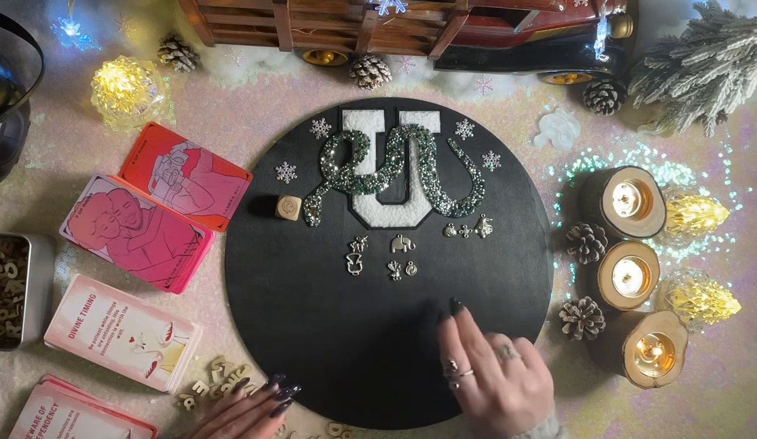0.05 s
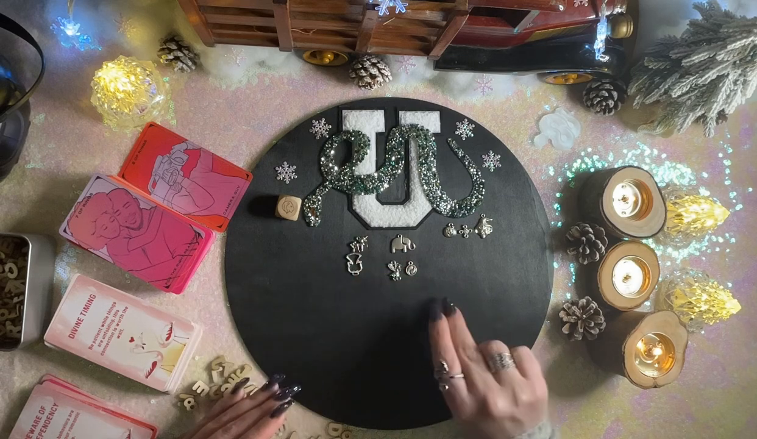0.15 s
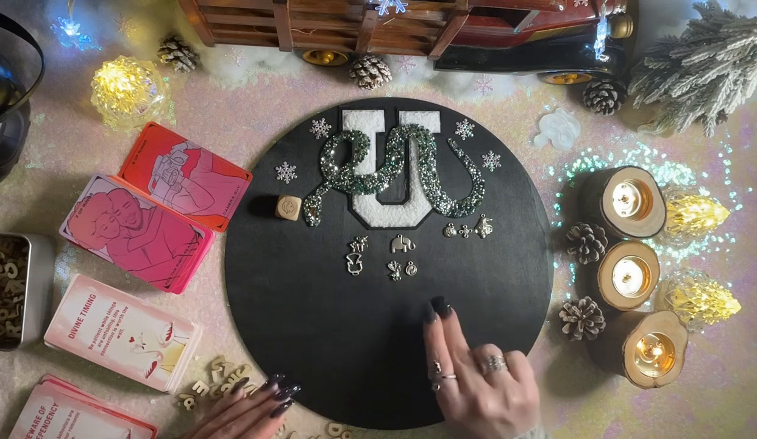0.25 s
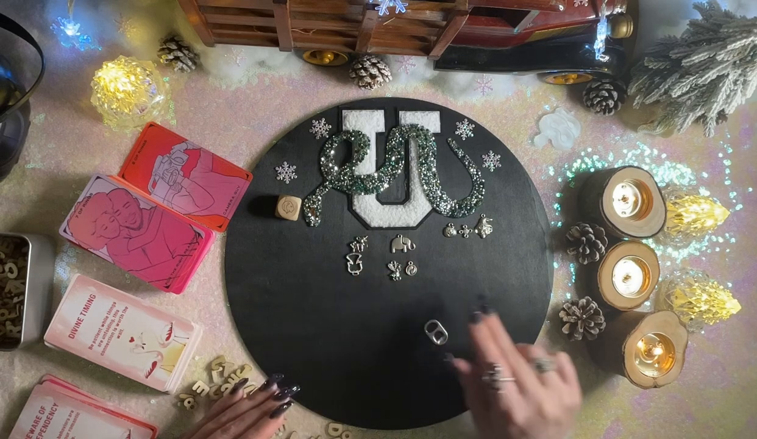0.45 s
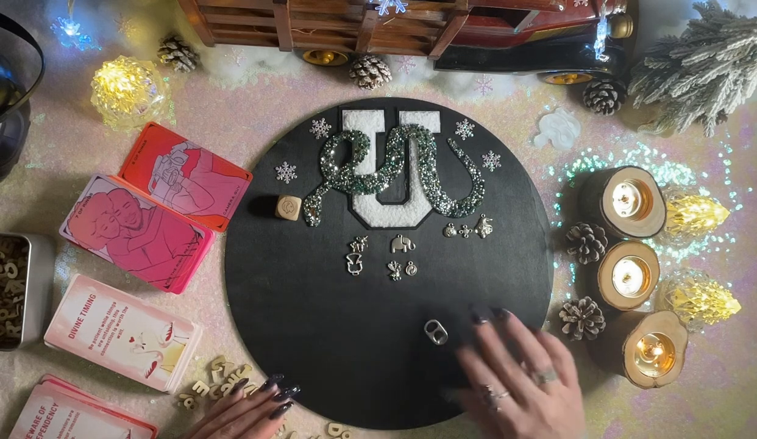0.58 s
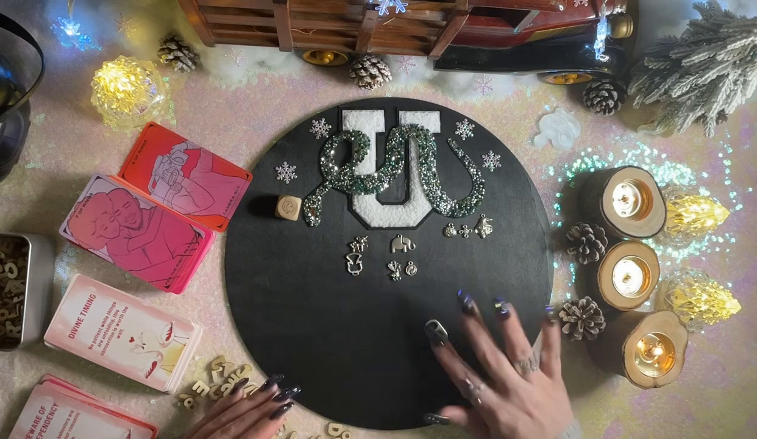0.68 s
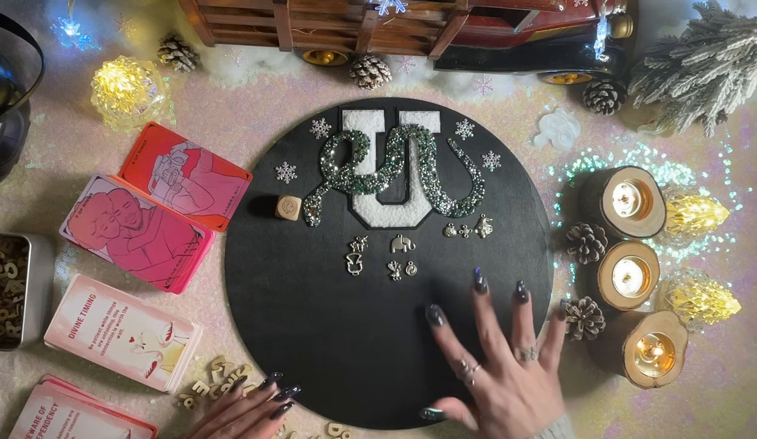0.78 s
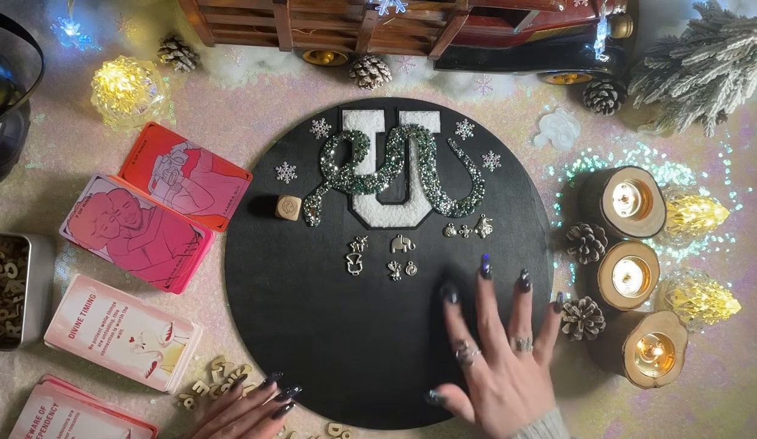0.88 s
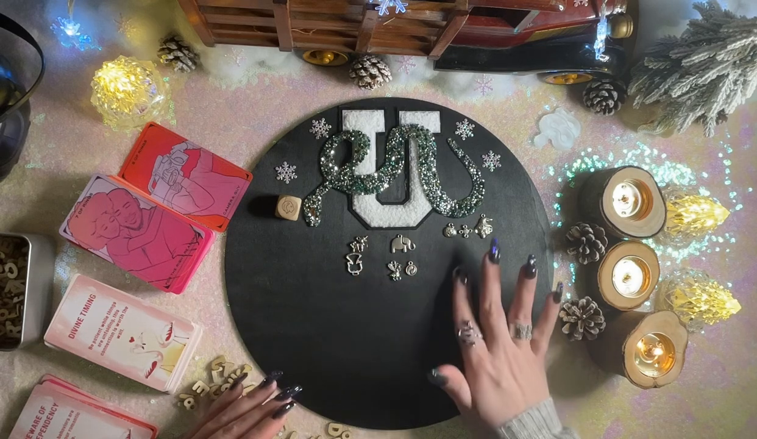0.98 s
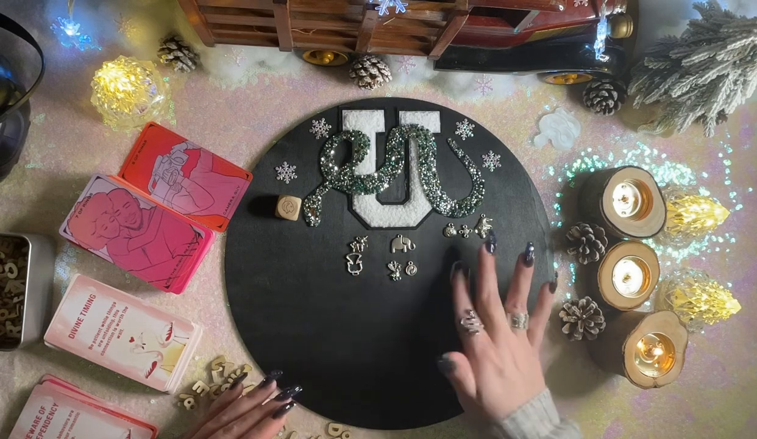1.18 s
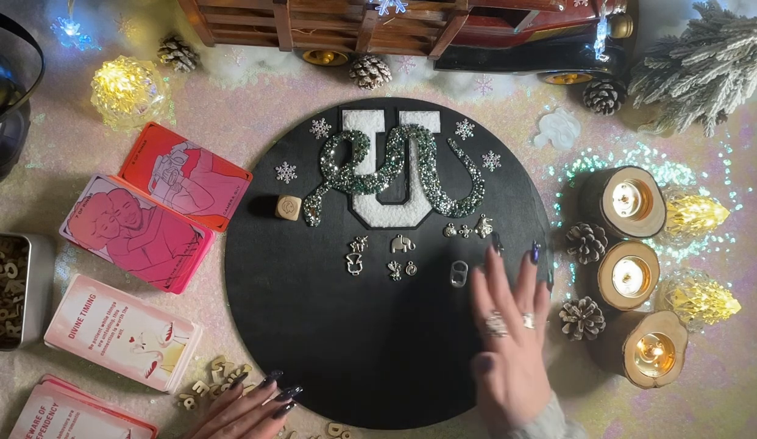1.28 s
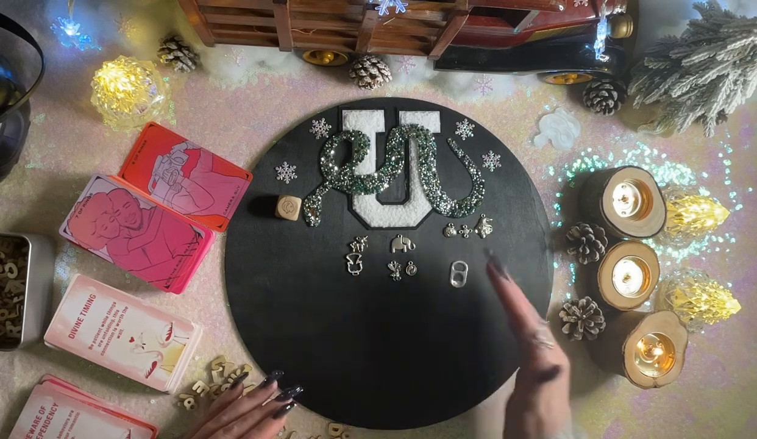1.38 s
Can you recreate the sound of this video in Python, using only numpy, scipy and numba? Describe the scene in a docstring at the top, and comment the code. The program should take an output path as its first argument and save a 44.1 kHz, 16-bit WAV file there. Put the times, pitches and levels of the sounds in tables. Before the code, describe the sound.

A small metal pull tab drops onto a thin board at about 0.2 seconds and bounces with quick, light clicks, settling by 0.5 seconds. From 0.7 seconds a fingertip slides it across the board with a grainy scrape, catching a few times. Around 1.2 to 1.3 seconds it clinks against small metal charms. A low hum and faint hiss of a small room lie underneath.

```python
"""A small room with a thin board on a table. A metal pull tab drops on the board and bounces to rest.
A fingertip slides it over the grain; it catches a few times and clinks against small charms.
Contacts are short noise cracks, the slide is dense ticks; both ring the modes of board and tab.
The room answers briefly, over a low hum, rumble and faint hiss."""
import sys
import numpy as np
from scipy import signal
from scipy.fft import rfft, irfft
from scipy.io import wavfile
from scipy.ndimage import uniform_filter1d
from numba import njit

SR = 44100
rng = np.random.default_rng(int(sys.argv[2]) if len(sys.argv) > 2 else 0)


def put_to_file(sound):
    """Save the sound as 16-bit audio at rate SR, in the file named by the first command-line argument."""
    columns = np.atleast_2d(sound).T  # one column per channel
    safe = np.clip(columns, -1, 1)
    whole_steps = np.round(safe * 32767)
    wavfile.write(sys.argv[1], SR, whole_steps.astype(np.int16))


N = 63945

# low room hum (frequency [Hz], level before swell [dB], waver [0-1])
HUM_TONES = [(61.4, -67, 1), (105.3, -58, 0.97), (117.6, -64, 0.8), (154.8, -59.5, 0.8)]
# swell of hum and rumble (time [s], gain [dB])
SWELL_GAIN = [(0, -4), (.4, -2), (.57, 4.5), (.8, -7), (1.15, -5), (1.35, -4)]
# upper hum (time [s], level [dB])
DRONE_LEVEL = [(0, -65), (.65, -59), (1.45, -59)]
# room noise spectrum (frequency [Hz], gain [dB])
AIR_COLOUR = [(15, -33.5), (25, -16), (130, -0.5), (185, -7), (217, -8.5), (335, -18.5), (416, -28.5),
              (1560, -52.5), (3620, -52), (9570, -62), (16000, -46)]
# modes of board and tab (frequency [Hz], resonance height [dB], t60 [s])
BOARD_TAB_MODES = [(638, -4.5, 0.031), (843, 5, .04), (995, 7.5, 0.059), (1220, -14, 0.09),
                   (1504, -4, 0.14), (1633, -1, 0.037), (1997, -4, .12), (2500, -17.5, 0.086),
                   (3490, -8, 0.019), (4350, -5, 0.011), (4610, -10, 0.068), (5700, -6.5, 0.024),
                   (6730, -4.5, .13), (7770, -8, 0.015)]
# sliding tab (time [s], body level [dB], rasp level [dB], hiss level [dB])
SLIDE_LEVELS = [(0.724, -85, -82, -84.5), (0.737, -47, -52, -55), (.775, -43.5, -53, -54),
                (.803, -49, -57, -60), (0.816, -43, -61, -55.5), (.833, -44, -59, -57),
                (0.862, -43.5, -57, -56.5), (0.885, -36, -48, -51.5), (.93, -45, -51, -58),
                (.985, -48.5, -50.5, -59.5), (1.045, -58, -55.5, -66.5), (1.097, -49, -52.5, -70),
                (1.135, -63.5, -63.5, -69.5), (1.2, -58.5, -70, -79), (1.26, -55.5, -77, -53.5),
                (1.325, -61, -101, -81), (1.361, -69.5, -93, -85.5), (1.45, -69.5, -85, -86.5)]
# friction spectrum (frequency [Hz], gain [dB])
FRICTION_COLOUR = [(200, -45.5), (500, -13), (650, -1), (1250, 2), (1800, -9), (2250, -3.5), (2800, -11.5),
                   (3450, -14), (4900, -20.5), (6250, -20), (6900, -21.5), (7950, -17), (9400, -30),
                   (16000, -32.5)]
# board resonances under the moving tab (time [s], lower [Hz], upper [Hz])
GLIDE_PATH = [(.785, 795, 1520), (.815, 774, 1158), (.89, 858, 1200), (.97, 1006, 1304), (1.09, 1104, 1520)]
# contact near the board's rim (frequency [Hz], gain [dB])
RIM_COLOUR = [(100, -22.5), (510, -19.5), (650, -5), (1130, -2), (1370, -3.5), (1900, -1), (3100, -7),
              (4500, -3.5), (5150, -10), (8600, -11.5), (9800, -18.5), (11900, -14), (16000, -25)]
# contact further in (frequency [Hz], gain [dB])
INNER_COLOUR = [(100, -19.5), (500, -14.5), (850, -3), (1280, 6), (1550, -11), (2250, 0.5), (3100, -7.5),
                (5200, -19.5), (7900, -6), (9500, -19.5), (12000, -21.5), (16000, -38)]
# tab catching and touching charms (time [s], 4 gains at CONTACT_HZ [dB], favoured resonance [Hz])
CLINK_HITS = [(.9118, -15, -16.5, -33, -19, 1200), (.9243, -12.5, -18.5, -49, -50, 1280),
              (.9492, -21.5, -29, -45, -41, 2130), (.9690, -16, -18, -37, -31, 2250),
              (1.0078, -17.5, -21, -29.5, -28, 1280), (1.1856, -34, -21.5, -31, -61, 2190),
              (1.2133, -40, -8.5, -56, -27.5, 3050), (1.2162, -17, -15.5, -9, -4.5, 1234),
              (1.2225, -28, -17, -23, -13, 8200), (1.2438, -23, -16.5, -29, -17, 3100),
              (1.2503, -18, -19, -21.5, -5.5, 2170), (1.2622, -29, -17, -27, -22, 3150),
              (1.2748, -24, -15.5, -25, -27, 2170), (1.301, -28, -26, -28.5, -22, 2280)]
# tab and nails landing (time [s], 4 gains at CONTACT_HZ [dB], 2 favoured resonances [Hz])
BOUNCE_HITS = [(.2146, -7, -16, -20, -18, 1086, 2420), (.2279, -10.5, -11, -6.5, -9.5, 3410, 5470),
               (.2541, -14.5, -20.5, -34, -43, 690, 1970), (.3144, -4, -5, -7.5, 0, 730, 4540),
               (.3446, -16.5, -18, -16, -22, 1550, 5950), (.3593, -24, -21, -14, -20, 1690, 6100),
               (.3715, -14.5, -18, -24, -13.5, 1600, 4570), (.3736, -7.5, -13.5, -10, -13.5, 1620, 2520),
               (.4102, -11.5, -13, -8.5, -17, 810, 1560), (.4266, -15, -25, -16, -14.5, 1180, 4360),
               (.4371, -19, -17, -11.5, -18.5, 775, 7000), (.4423, -20, -23, -19.5, -25, 1200, 5600),
               (.4533, -20.5, -30.5, -21, -21, 1010, 7340), (.4635, -25, -28.5, -30, -23, 760, 2010),
               (.6140, -34, -57, -57, -55, 1010, 1770), (.6555, -50, -62, -40.5, -47, 1050, 7640),
               (.6715, -66, -54, -34.5, -46, 6500, 7660), (.7370, -22, -22, -18, -13, 3350, 8900)]

DRONE_HZ, DRONE_WAVER, WAVER_PER_S = 256, 0.16, 8.49
AIR_DB, RUMBLE_HZ = -56.5, (52, 446)
ROOM_DB, ROOM_T60_S, TREBLE_T60_S, ROOM_SPLIT_HZ, ROOM_ONSET_S = -7.5, 0.14, 0.095, 8400, 0.0064
SCATTER_DB, SCATTER_T60_S, DIFFUSION_HZ = -11.5, 0.014, 24
GRAINS_PER_S, GRAIN_SPREAD_DB = 12000, 1
SLIDE_RING_DB, SLIDE_SPLIT_HZ, GLIDE_WIDTH = -3, (1650, 3280), .1
CONTACT_HZ = (1050, 4000, 7000, 12500)
CRACK_S, CRACK_RISE_S, CRACK_WINDOW_S = 0.0012, 0.00036, 0.057
CHATTER_PER_DB, FIRM_DB = .012, -10
FAVOURED_DB, FAVOURED_WIDTH, MODE_SPREAD_DB = 4, .08, 1.5
TOP_HZ = 15700


def undb(db):
    """dB to amplitude."""
    return 10 ** (np.asarray(db) / 20)


def unit(x):
    """Scale to rms 1."""
    return x / np.sqrt(np.mean(x ** 2))


def curve(times_s, values):
    """Breakpoints to N samples, linear."""
    return np.interp(np.arange(N) / SR, times_s, values)


def through(x, response):
    """Convolve, same length."""
    return signal.fftconvolve(x, response)[:len(x)]


def band(x, hz, kind):
    """Steep low-, high- or band-pass."""
    return signal.sosfilt(signal.butter(4, hz, kind, fs=SR, output="sos"), x)


def colour(points, size=2048):
    """Minimum-phase response from (frequency [Hz], gain [dB]) points."""
    hz, db = np.array(points, float).T
    bin_hz = np.arange(size // 2 + 1) * SR / size
    gain = undb(np.interp(np.log(bin_hz + 1), np.log(hz), db))
    cepstrum = irfft(np.log(gain))
    cepstrum[1:size // 2] *= 2
    cepstrum[size // 2 + 1:] = 0
    return irfft(np.exp(rfft(cepstrum)))


def fade(t60_s):
    """Exponential decay, 60 dB in t60_s."""
    return np.exp(-np.log(1000) * np.arange(N) / SR / t60_s)


def walk(rate_per_s):
    """Smooth random drift, rms 1."""
    hold = int(SR / rate_per_s)
    steps = np.repeat(rng.standard_normal(N // hold + 1), hold)
    return unit(uniform_filter1d(uniform_filter1d(steps, hold), hold)[:N])


@njit
def resonance(x, hz, width):
    """Band-pass, gain 1 at a moving centre; width = 1/Q."""
    y = np.empty(len(x))
    band_state, low_state = 0., 0.
    for i in range(len(x)):
        g = np.tan(np.pi * hz[i] / SR)
        passed = (band_state + g * (x[i] - low_state)) / (1 + g * (g + width))
        band_state = 2 * passed - band_state
        low_state += 2 * g * passed
        y[i] = width * passed
    return y


def tone(hz, waver):
    """Sine wavering in level and phase, rms 1."""
    drift = 1 + waver * (walk(WAVER_PER_S) + 1j * walk(WAVER_PER_S))
    carrier = np.exp(2j * np.pi * (hz * np.arange(N) / SR + rng.random()))
    return unit((drift * carrier).real)


def background():
    """Swelling low hum and rumble, a steadier upper hum, faint hiss."""
    hum = sum(undb(db) * tone(hz, waver) for hz, db, waver in HUM_TONES)
    drone = tone(DRONE_HZ, DRONE_WAVER) * undb(curve(*np.array(DRONE_LEVEL).T))
    air = undb(AIR_DB) * unit(through(rng.standard_normal(N), colour(AIR_COLOUR)))
    rumble = band(air, RUMBLE_HZ, "bandpass")
    hiss = band(air, RUMBLE_HZ[1], "high")
    swell = undb(curve(*np.array(SWELL_GAIN).T))
    return (hum + rumble) * swell + drone + hiss


def diffuse(response, broad_ratio=30):
    """Level narrow peaks so the room rings on no single pitch."""
    spectrum = rfft(response)
    power = np.abs(spectrum) ** 2
    bins = int(DIFFUSION_HZ * N / SR)
    broad = uniform_filter1d(power, bins * broad_ratio)
    narrow = uniform_filter1d(power, bins)
    return irfft(spectrum * np.sqrt(broad / narrow), N)[:N // 2]


def room(x):
    """Direct sound, scatter from things on the table, and a short tail whose treble dies first."""
    onset = 1 - np.exp(-(np.arange(N) / SR / ROOM_ONSET_S) ** 2)
    low, high, near = rng.standard_normal((3, N))
    body = band(low, ROOM_SPLIT_HZ, "low") * fade(ROOM_T60_S)
    treble = undb(4.5) * band(high, ROOM_SPLIT_HZ, "high") * fade(TREBLE_T60_S)
    tail = onset * (body + treble)
    scatter = onset * near * fade(SCATTER_T60_S)
    response = undb(ROOM_DB) * tail / np.linalg.norm(tail)
    response += undb(SCATTER_DB) * scatter / np.linalg.norm(scatter)
    return x + through(x, diffuse(response))


def ring(force, drive_db, size=8192):
    """Contact force plus the damped modes of board and tab; one drive_db per mode."""
    t = np.arange(size) / SR
    hz, db, t60_s = np.array(BOARD_TAB_MODES).T[:, :, None]
    damping = np.log(1000) / t60_s
    modes = undb(db) * 2 * damping / SR * np.exp(-damping * t) * np.cos(2 * np.pi * hz * t)
    return force + through(force, undb(drive_db) @ modes)


def slide():
    """The tab's edge trips over the board's grain: dense uneven ticks, shaped in three bands."""
    trips = rng.random(N) < GRAINS_PER_S / SR
    strength = undb(GRAIN_SPREAD_DB * np.minimum(rng.exponential(size=N), 4))
    ticks = trips * strength * rng.choice([-1, 1], N)
    friction = through(ticks, colour(FRICTION_COLOUR))
    times_s, *centres_hz = np.array(GLIDE_PATH).T
    glides = sum(resonance(friction, curve(times_s, hz), GLIDE_WIDTH) for hz in centres_hz)
    rub = ring(friction, np.full(len(BOARD_TAB_MODES), SLIDE_RING_DB)) + glides
    body = band(rub, SLIDE_SPLIT_HZ[0], "low")
    rasp = band(rub, SLIDE_SPLIT_HZ, "bandpass")
    hiss = band(rub, SLIDE_SPLIT_HZ[1], "high")
    times_s, *levels_db = np.array(SLIDE_LEVELS).T
    return sum(unit(part) * undb(curve(times_s, db)) for part, db in zip((body, rasp, hiss), levels_db))


def crack(decay_s, size=2048, passes=2):
    """Brief chatter of metal on the board: even spectrum, unit energy."""
    t = np.arange(size) / SR
    rise = 1 - np.exp(-t / CRACK_RISE_S)
    burst = rng.standard_normal(size) * rise * np.exp(-t / decay_s)
    for _ in range(passes):
        spectrum = rfft(burst)
        whitened = irfft(spectrum / (np.abs(spectrum) + 1e-9))
        burst = whitened * np.sqrt(rise) * np.exp(-(t / CRACK_WINDOW_S) ** 2)
    return burst / np.linalg.norm(burst)


def contacts(hits, place_colour, ring_samples=8192):
    """One crack per hit, with its own hardness and mode mix; the contact point favours resonances."""
    track = np.zeros(2 * N)
    for start_s, *row in hits:
        gains_db, favoured_hz = row[:len(CONTACT_HZ)], row[len(CONTACT_HZ):]
        weakness_db = max(FIRM_DB - max(gains_db), 0)
        decay_s = CRACK_S * (1.5 + CHATTER_PER_DB * weakness_db)  # weak contacts chatter longer
        hardness = colour(list(zip(CONTACT_HZ, gains_db)))
        force = through(np.pad(crack(decay_s), (0, ring_samples)), hardness)
        peaks = sum(resonance(force, np.full(len(force), float(hz)), FAVOURED_WIDTH)
                    for hz in favoured_hz)
        drive_db = MODE_SPREAD_DB * rng.standard_normal(len(BOARD_TAB_MODES))
        hit = ring(force, drive_db) + undb(FAVOURED_DB) * peaks
        start = int(start_s * SR)
        track[start:start + len(hit)] += hit
    board = colour(place_colour)
    return through(track[:N], board / np.linalg.norm(board))


def scene():
    """Bounces, clinks and slide in the room, over the background; mono."""
    bounces = contacts(BOUNCE_HITS, RIM_COLOUR)
    clinks = contacts(CLINK_HITS, INNER_COLOUR)
    return (room(bounces + clinks + slide()) + background())[None]


def record(dry):
    """Steep low-pass at TOP_HZ."""
    return signal.sosfilt(signal.ellip(8, .2, 70, TOP_HZ, fs=SR, output="sos"), dry)


dry = scene()
out = record(dry)
put_to_file(out)
```